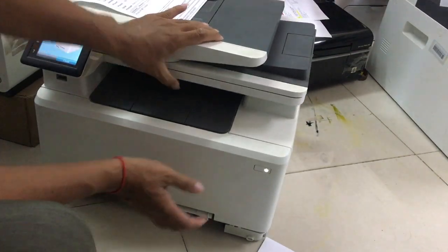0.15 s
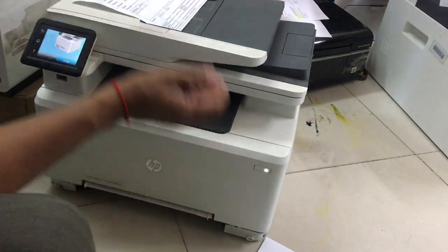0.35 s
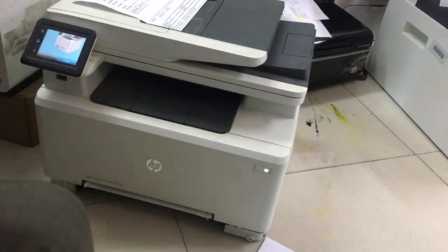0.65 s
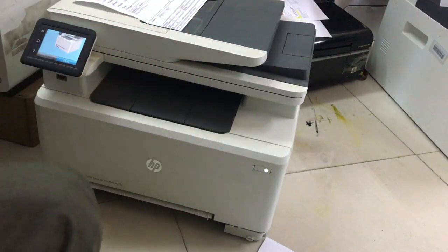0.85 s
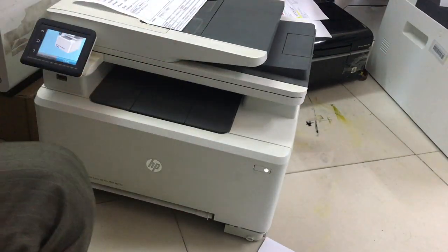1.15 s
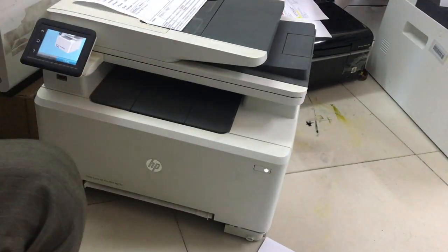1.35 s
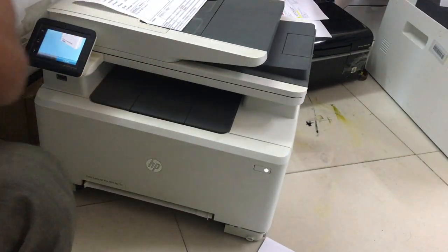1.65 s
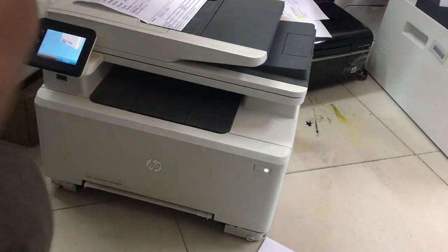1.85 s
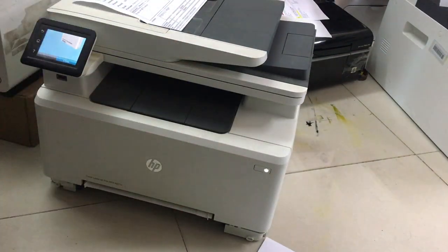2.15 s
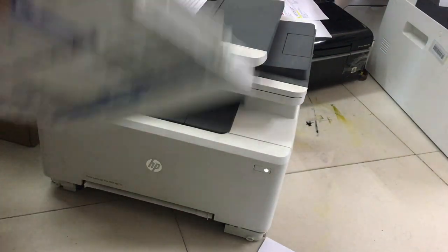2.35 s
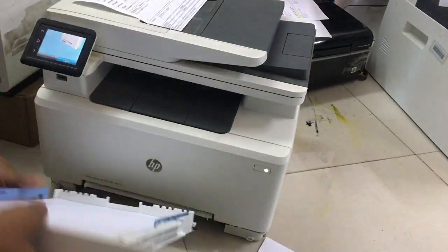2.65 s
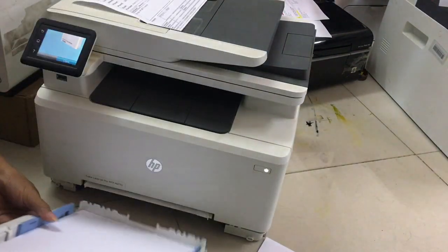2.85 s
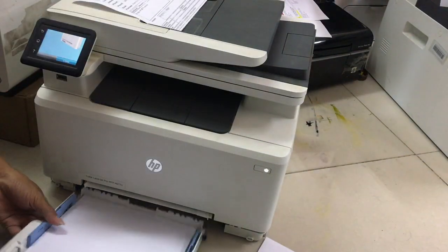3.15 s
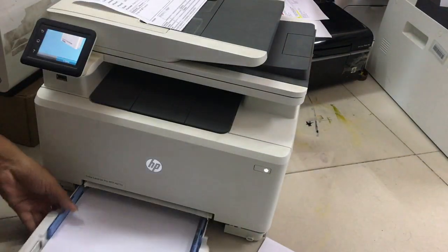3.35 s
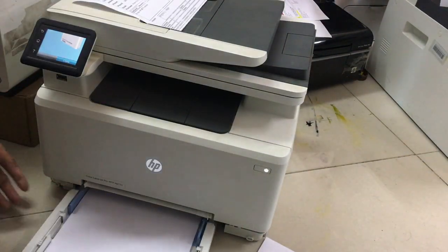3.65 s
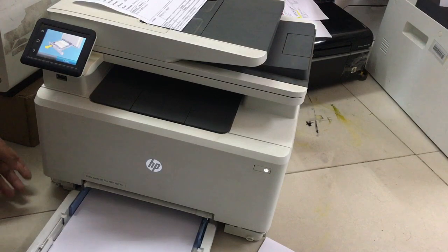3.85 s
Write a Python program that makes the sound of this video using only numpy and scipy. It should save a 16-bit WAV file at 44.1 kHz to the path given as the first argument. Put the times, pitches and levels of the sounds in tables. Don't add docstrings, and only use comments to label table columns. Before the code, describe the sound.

A plastic paper tray is fitted into a printer, close up in a small tiled room. A panel's dull boom dies at the start, then quiet rustling with a faint click at 1.6 s and a stronger swish near 2.2 s. Light rattles from 2.7 s precede a sharp clack at 3.0 and a lesser one at 3.1. Scraping rattles thicken from 3.3, ending in a hard knock at 3.84, over faint rumble, hiss and drone.

```python
import sys
import numpy as np
from scipy import signal
from scipy.fft import rfft, irfft
from scipy.io import wavfile
from scipy.ndimage import uniform_filter1d

SR = 44100
rng = np.random.default_rng(int(sys.argv[2]) if len(sys.argv) > 2 else 0)


def bounce(signal):
    frames = np.transpose(np.atleast_2d(signal))
    limited = np.clip(frames, -1, 1)
    pcm = np.round(limited * 32767).astype(np.int16)
    wavfile.write(sys.argv[1], SR, pcm)


def rack_gain(trim_db):
    fader = np.asarray(trim_db, float)
    return 10 ** (fader / 20)


N = 176400

# (frequency [Hz], t60 [s])
ROOM_DECAY = [(200, 0.183), (1400, 0.2813), (4000, 0.28), (10000, 0.304)]


def rms_one(x):
    return x / np.sqrt(np.mean(x ** 2) + 1e-20)


def at_hz(points, hz):
    point_hz, value = np.transpose(points)
    return np.interp(np.log(hz + 1e-9), np.log(point_hz), value)


def drift(rate):
    r = np.exp(-80 * np.pi * rate / SR)
    slow = signal.lfilter([1], [1, -2 * r, r * r], rng.standard_normal(N // 40 + 2002))[2000:]
    return np.interp(np.arange(N) / 40, np.arange(len(slow)), rms_one(slow))


def ring(clicks, hz, t60):
    r = rack_gain(-60 / (t60 * SR))
    w = 2 * np.pi * hz / SR
    return signal.lfilter([0, np.sin(w)], [1, -2 * r * np.cos(w), r * r], clicks + 1e-18)


def bands(x, gain_of_band):
    edges = 25 * 2 ** np.arange(0, 9.6, 0.5)
    total = 0
    for k, (low, high) in enumerate(zip(edges, edges[1:])):
        band = signal.butter(2, [low, high], "band", fs=SR, output="sos")
        total = total + gain_of_band(np.sqrt(low * high)) * signal.sosfilt(band, x[k % len(x)])
    return total


def contacts(size, per_s, spread_db):
    sizes = rack_gain(spread_db * np.minimum(rng.exponential(1, size), 4)) * rng.choice([-1, 1], size)
    return sizes * (rng.random(size) < per_s / SR)


def shell(clicks, tilt_db):
    # (frequency [Hz], level [dB per Hz])
    crack_colour = [(120, -39.5), (200, -4.5), (456, -20), (1120, 0), (3560, -6), (3900, -3.5),
                    (4950, -9.5), (11900, -22.5), (16000, -30.5)]
    hz = np.fft.rfftfreq(2048, 1 / SR)
    colour_db = at_hz(crack_colour, hz) + tilt_db * np.log2(np.maximum(hz, 200) / 2000)
    cepstrum = irfft(np.log(rack_gain(colour_db)))
    cepstrum[1:1024] *= 2
    cepstrum[1025:] = 0
    response = irfft(np.exp(rfft(cepstrum)))
    return rms_one(signal.fftconvolve(clicks, response)[:len(clicks)])


def tray(clicks, tilt_db, crack_db, scatter_db):
    # (frequency [Hz], level [dB], t60 [s])
    tray_modes = [(732.2, -0.5, 0.12), (1031.6, -1, .1), (1250, -3, 0.091), (1740, -6, 0.22),
                  (1940, 3.5, 0.14), (2375, -16, 0.086), (3030, -9, 0.055), (3100, 1.5, 0.076),
                  (3886, -9.5, 0.087), (4320, -28.5, 0.1), (5764, 5.5, 0.16), (6600, 6.5, 0.055),
                  (8930, 5, 0.041), (9500, -26, .05)]
    damping, longest_cycles, detune = 0.4, 28, 0.0478
    modes = 0
    for hz, db, t60 in tray_modes:
        level_db = db + tilt_db * np.log2(hz / 2000) + scatter_db * rng.normal()
        pitch = hz * (1 + detune * rng.normal())
        modes = modes + rack_gain(level_db) * ring(clicks, pitch, min(damping * t60, longest_cycles / hz))
    return rms_one(rms_one(modes) + rack_gain(crack_db) * shell(clicks, tilt_db))


def hits(rows):
    size = 4096
    out, t = np.zeros((2, N + size)), np.arange(size) / SR
    for start, db, hz, tilt_db, chatter in rows:
        clicks = contacts(size, per_s=1200, spread_db=0.0) + 0.444 * rng.standard_normal(size)
        attack = np.minimum(t / (0.00047 + 0.226 * chatter), 1)
        clicks = clicks * attack * np.exp(-(t / max(chatter, 0.001)) ** 1.647)
        body = tray(clicks, tilt_db, crack_db=7.5, scatter_db=7.0)
        snap = shell(clicks * np.exp(-t / 0.00215), tilt_db + 3.0)
        accent = rms_one(ring(clicks, hz, t60=0.0157))
        direct = body + rack_gain(-9) * snap + rack_gain(-3) * accent
        single_click = 1.0 * (np.arange(size) == int(chatter * SR / 2))
        to_room = shell(single_click, tilt_db) + rack_gain(-10) * body
        peak = np.sqrt(np.max(uniform_filter1d(direct ** 2, size=220)))
        i = int(start * SR)
        out[:, i:i + size] += rack_gain(db - 8) * np.array([direct, to_room]) / peak
    low_cut = signal.butter(3, 481, "high", fs=SR, output="sos")
    return signal.sosfilt(low_cut, out[:, :N])


def pushes(rows, cycles):
    out, size = np.zeros(N + SR), SR // 2
    for start, db, hz in rows:
        turns = np.arange(size) / SR * hz
        rise = np.sin(np.pi / 2 * np.minimum(turns / 1.3, 1)) ** 2
        i = int(start * SR)
        out[i:i + size] += rack_gain(db - 60 * turns / cycles) * rise * np.sin(2 * np.pi * turns)
    return out[:N]


def slam():
    # (frequency [Hz], level [dB per Hz])
    boom_colour = [(30, -21), (70, 8), (130, -2.5), (250, -7), (410, -2), (900, -4.5), (3140, -10.5),
                   (16000, -38)]
    slam_db, t60_s = -25, 0.2135
    t = np.arange(N) / SR

    def gain(hz):
        panel = rack_gain(-60 * t / t60_s * (hz / 1000) ** 0.108)
        tail = rack_gain(-60 * t / at_hz(ROOM_DECAY, hz) / 3.2)
        return rack_gain(at_hz(boom_colour, hz)) * (panel + 0.103 * tail)

    boom = bands(rng.standard_normal((2, N)), gain)
    return rack_gain(slam_db) * boom / np.std(boom[:1000])


def slam_bounce():
    # (time [s], peak [dB], strongest ring [Hz], brightness [dB per octave], chatter [s])
    panel_bounces = [
        (.001, -23, 410, -5., .008),
        (.011, -18, 3000, 2., .006),
        (.031, -30, 3000, 2., .004),
    ]
    return hits(panel_bounces)


def bumps():
    # (time [s], peak [dB], pitch [Hz])
    body_bumps = [(3.417, -29, 225), (3.436, -29, 190), (3.634, -31, 215), (3.672, -28, 130),
                  (3.674, -26, 205), (3.68, -30, 290), (3.708, -32, 205), (3.73, -36, 250),
                  (3.478, -34, 110), (3.494, -35, 270), (2.691, -33, 82), (3.13, -32, 664),
                  (3.623, -22, 720), (2.77, -35, 72), (2.8, -37, 150), (2.86, -36, 170), (3.68, -25, 600),
                  (2.98, -34, 426), (3.776, -32, 620), (3.838, -34, 210), (.002, -19, 406),
                  (.004, -24, 120), (3.42, -34, 410), (1.61, -42, 500)]
    return pushes(body_bumps, cycles=19)


def air():
    # (frequency [Hz], level [dB per Hz])
    air_colour = [(15, -39), (25, -3), (76, -2), (270, -12.5), (301, -21), (335, -15), (911, -21),
                  (1070, -19.5), (16000, -48.5)]

    def gain(hz):
        unrest_db = 0.1049 + 1.15 * (hz < 300)
        return rack_gain(at_hz(air_colour, hz) + unrest_db * drift(3.49))

    return rack_gain(-49.5) * rms_one(bands(rng.standard_normal((2, N)), gain))


def drone():
    hum = rms_one(ring(rng.standard_normal(N), hz=74.16, t60=0.167))
    return rack_gain(-55.5 + 3.36 * drift(2.29)) * hum


def rubs():
    # (start [s], rise [s], fall [s], level [dB], brightness [dB per octave])
    rub_swells = [(.2, 0.061, 0.204, -65.5, -7), (.55, 0.052, 0.145, -59.5, 2),
                  (1.07, 0.035, 0.305, -63, -2), (1.26, 0.0224, 0.15, -56, -1),
                  (1.35, 0.0366, 0.121, -52, -2.5), (1.599, 0.0059, 0.13, -52.5, -4.5),
                  (1.9, 0.149, 0.109, -66, -3), (2.08, 0.09, 0.105, -60, -1),
                  (2.17, 0.0425, 0.1467, -47, -0.5), (2.27, 0.061, 0.345, -53, -1),
                  (2.36, 0.122, 0.232, -52.5, 4), (2.52, 0.113, 0.198, -53.5, 0)]
    # (frequency [Hz], level [dB per Hz])
    cloth_colour = [(590, -20), (1000, 3), (2410, -2), (2910, 3.5), (3980, 0), (12400, -7), (16000, -12)]
    t = np.arange(N) / SR
    start, rise, fall, db, tilt_db = np.transpose(rub_swells)[:, :, None]
    ramp = np.minimum((t - start) / rise, 1 - (t - start - rise) / fall)
    swells = np.sin(np.pi / 2 * np.clip(ramp, 0, 1)) ** 2
    grain = rng.standard_normal((2, N)) + 0.182 * contacts(N, per_s=600, spread_db=8.0)

    def gain(hz):
        if hz <= 900:
            return 0
        swelling = (rack_gain(db + tilt_db * np.log2(hz / 5000)).T @ swells)[0]
        return rack_gain(at_hz(cloth_colour, hz) + 1.5 + 0.874 * drift(13)) * swelling

    return rack_gain(1.8 * drift(16.8)) * bands(grain, gain)


def clacks():
    # (time [s], peak [dB], strongest ring [Hz], brightness [dB per octave], chatter [s])
    tray_clacks = [(0.5596, -41, 2754, -1, 0.0028), (0.574, -46.5, 2500, 2, 0.0048),
                   (1.604, -30, 4014, -1, 0.01), (1.62, -35, 2305, -0.5, .013),
                   (2.0951, -46, 2700, -3, 0.0045), (2.1248, -46, 2760, -2.5, 0.0078),
                   (2.2959, -35, 4180, 5, 0.0047), (2.9741, -3.5, 4236, 1.5, 0.0048),
                   (2.984, -16.5, 1532, 1.5, 0.01427), (3.1279, -14, 4086, 1.5, 0.0066),
                   (3.8417, -1.5, 3870, 1, 0.0052)]
    return hits(tray_clacks)


def snaps():
    # (time [s], peak [dB], strongest ring [Hz], brightness [dB per octave], chatter [s])
    paper_snaps = [
        (1.09, -50.5, 4030, 5.5, .004),
        (1.222, -53.5, 9000, 10, 0.0043),
        (1.308, -44.5, 3500, -2, 0.005),
        (1.44, -46, 9660, 9, 0.0036),
        (3.074, -43, 9800, 7, 0.0015),
        (2.885, -39.5, 1700, -4.5, 0.007),
        (2.905, -37, 1730, -2.5, 0.0045),
    ]
    return hits(paper_snaps)


def pings():
    # (time [s], peak [dB], pitch [Hz])
    guide_pings = [(2.698, -44, 922), (2.777, -43, 930), (2.799, -36.5, 1432), (2.821, -33, 1408),
                   (2.845, -37.5, 1705), (2.846, -34, 3120), (2.862, -41, 899), (2.885, -39, 894),
                   (2.988, -32, 1120), (1.607, -30.5, 2953), (1.612, -34.5, 3260), (3.225, -40.5, 894),
                   (1.612, -49.5, 1610)]
    return pushes(guide_pings, cycles=42)


def rattles():
    # (time [s], peak [dB], strongest ring [Hz], brightness [dB per octave], chatter [s])
    rail_rattles = [(2.697, -39, 987, -13, 0.0099), (2.796, -34.5, 2190, -4, 0.007),
                    (2.819, -53.5, 1410, -5.5, 0.008), (2.8435, -30, 3100, -3, 0.00544),
                    (3.219, -33, 1940, -2, 0.01305), (3.318, -25.5, 1493, -0.5, 0.0214),
                    (3.342, -21, 1613, -4.5, 0.0052), (3.416, -22, 1142, 1, 0.0052),
                    (3.4505, -23, 5600, -2.5, 0.006), (3.443, -39.5, 2500, 14, .005),
                    (3.4665, -20, 1615, -3, 0.0093), (3.494, -14.5, 1715, -2, 0.00514),
                    (3.499, -20.5, 1550, 0, 0.0077), (3.514, -29, 1506, -0.5, 0.0181),
                    (3.534, -20.5, 1110, -11, 0.00413), (3.5385, -17.5, 4560, 3, 0.0097),
                    (3.549, -20.5, 1600, -7, 0.0052), (3.562, -26, 1730, -3, 0.007),
                    (3.622, -12.5, 1136, -2, 0.006), (3.629, -22.5, 4270, 4.5, .006),
                    (3.643, -23.5, 4010, 1, 0.00394), (3.6495, -13, 5750, 3, 0.00405),
                    (3.655, -20.5, 1250, 2.5, .006), (3.666, -28.5, 1200, -2.5, .008),
                    (3.6765, -13, 1880, 1.5, 0.006), (3.683, -13.5, 1928, -1, .008),
                    (3.693, -20, 1204, 1, 0.005), (3.7, -19, 902, -6.5, .005),
                    (3.71, -42, 1200, -4.5, 0.0046), (3.7605, -24, 3200, 2, 0.00346),
                    (3.774, -14.5, 1466, 1, 0.00561), (3.779, -15, 1940, 1.5, 0.00526),
                    (3.836, -16, 1484, 1.5, 0.0089), (3.976, -52.5, 1200, 2.5, 0.0059)]
    return hits(rail_rattles)


def scrape():
    # (time [s], level [dB])
    scrape_levels = [(2.7, -61), (2.79, -54.5), (2.86, -45), (2.95, -53), (3.1, -51), (3.21, -45.5),
                     (3.3, -57), (3.36, -42), (3.41, -47.5), (3.46, -39.5), (3.55, -36.5), (3.59, -45.5),
                     (3.65, -34), (3.73, -48), (3.8, -46.5), (3.9, -48.5), (4.0, -52)]
    time, db = np.transpose(scrape_levels)
    gain = rack_gain(np.interp(np.arange(N) / SR, time, db, left=-120) + 3.16 * drift(31))
    clicks = contacts(N, per_s=1500, spread_db=1.0)
    return gain * tray(clicks, tilt_db=-1.22, crack_db=8, scatter_db=1.5)


def room(x):
    room_db, delay_s = -4, 0.00187
    early_db, early_t60_s = 9.5, 0.0664
    t = np.arange(SR // 2) / SR

    def fade(hz):
        return rack_gain(-60 * t / at_hz(ROOM_DECAY, hz)) + rack_gain(early_db - 60 * t / early_t60_s)

    tail = bands(rng.standard_normal((2, len(t))), fade) * np.clip(t / delay_s - 0.5, 0, 1)
    return rack_gain(room_db) * signal.fftconvolve(x, tail / np.sqrt(np.sum(tail ** 2)))[:N]


def scene():
    near = slam_bounce() + rubs() + clacks() + snaps() + pings() + rattles() + scrape()
    direct, to_room = near
    mix = direct + room(to_room) + slam() + bumps() + air() + drone()
    return mix[None]


def roll_off(x):
    return signal.sosfilt(signal.butter(12, 16690, fs=SR, output="sos"), x)


def record(dry):
    # (centre [Hz], width [Hz], depth [0-1])
    mic_dips = [(10336, 259, 0.35), (7040, 224, 0.12)]
    peak_top, bass_cut_hz = 0.96, 26.3
    hz = np.fft.rfftfreq(N, 1 / SR)
    response = hz ** 2 / (hz ** 2 + bass_cut_hz ** 2)
    for centre, width, depth in mic_dips:
        response = response * (1 - np.clip(depth, 0, 0.9) * np.exp(-((hz - centre) / width) ** 2))
    squashed = peak_top * np.tanh(dry / peak_top)
    heard = irfft(rfft(squashed) * response, N)
    top_cut = signal.cheby2(12, 50, 16500, fs=SR, output="sos")
    return roll_off(signal.sosfilt(top_cut, heard))


dry = scene()
out = record(dry)
bounce(out)
```